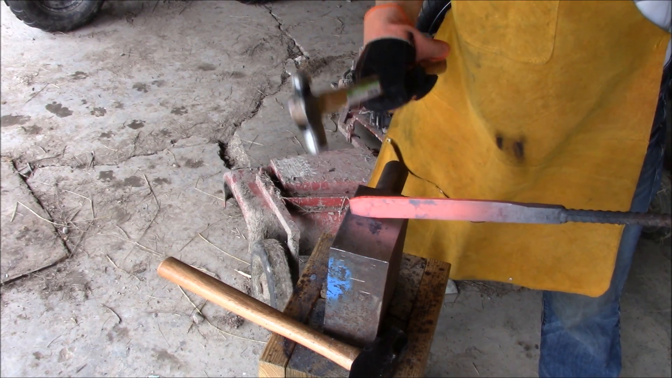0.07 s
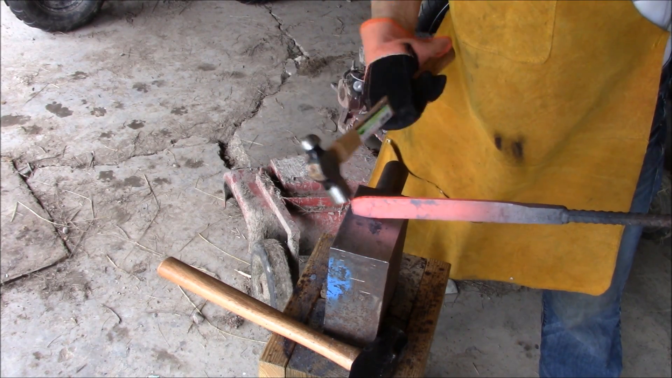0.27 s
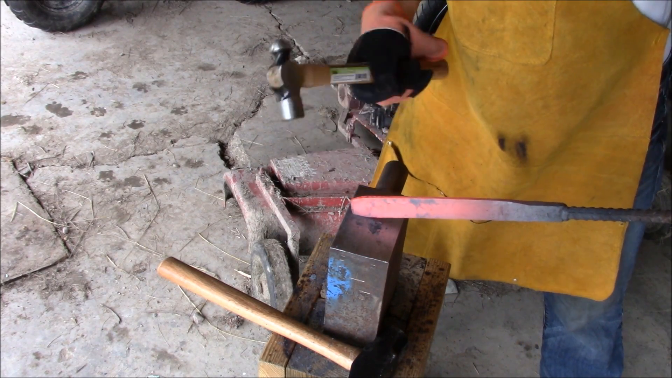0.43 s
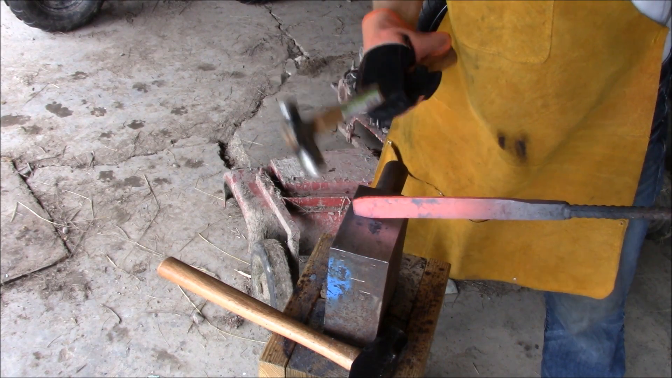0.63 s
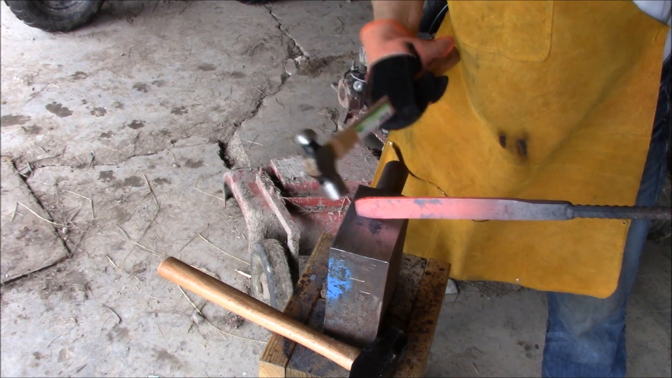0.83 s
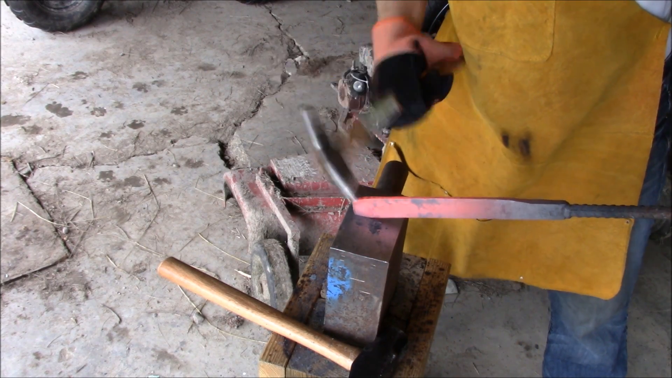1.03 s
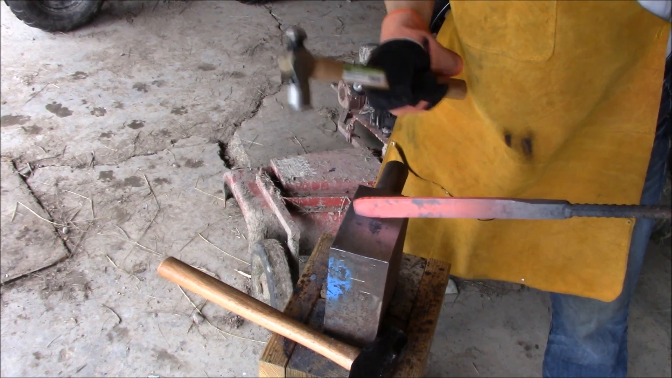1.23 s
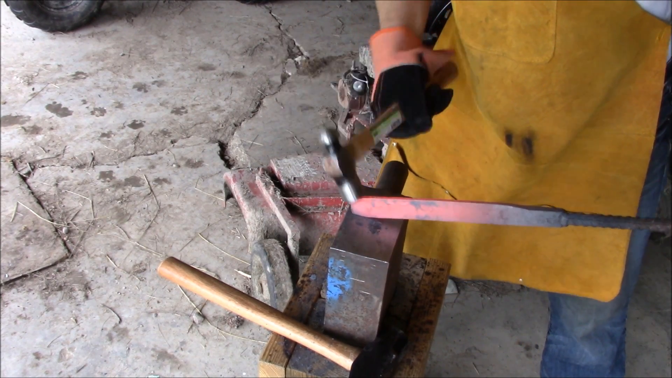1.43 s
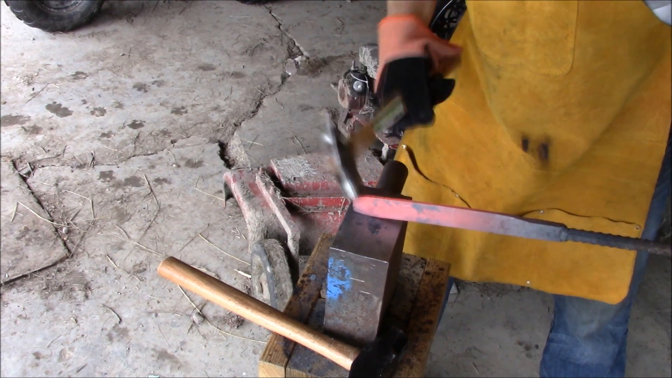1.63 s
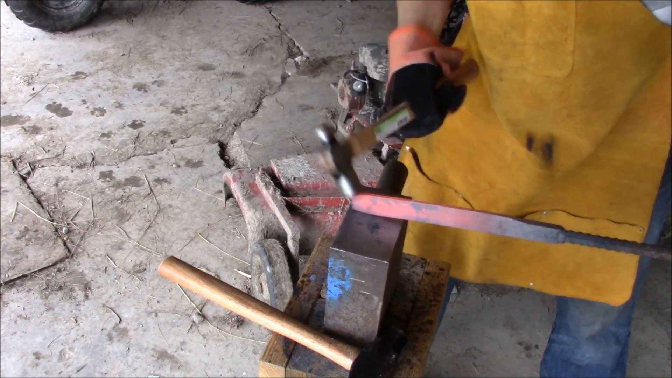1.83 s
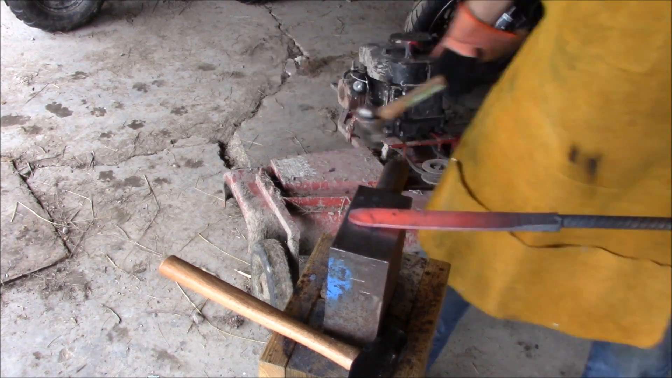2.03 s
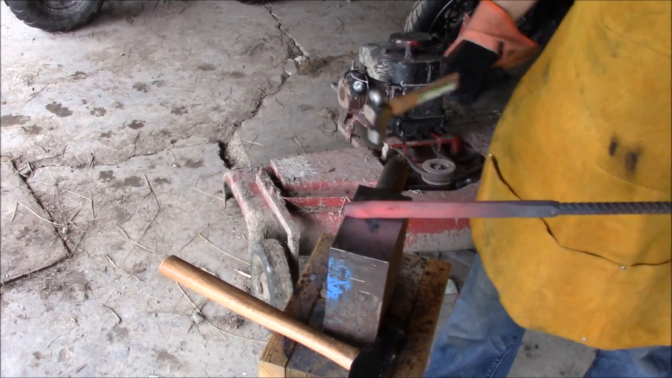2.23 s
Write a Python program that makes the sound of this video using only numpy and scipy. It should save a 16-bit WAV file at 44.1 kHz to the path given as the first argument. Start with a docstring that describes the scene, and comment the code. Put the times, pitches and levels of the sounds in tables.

```python
"""Five heavy hammer blows flatten a glowing steel bar on an anvil in a hard-walled workshop.
Each is a noise crack with a thud of short sines, coloured by the steel's resonances, then answered
by dense decaying noise and booming sines. After a brief dropout time runs four times as fast:
the blows become a high, quick rattle, then noise bursts knock and scrape as the bar leaves the anvil.
Under it lie air noise and a machine's faint sine hum, silent only in the dropout."""
import sys
import numpy as np
from scipy import signal
from scipy.fft import rfft, irfft
from scipy.io import wavfile
from scipy.ndimage import uniform_filter1d

SR = 44100
rng = np.random.default_rng(int(sys.argv[2]) if len(sys.argv) > 2 else 0)


def to_wav(sig):
    """Store sig (one row per channel, or 1-D mono) as 16-bit WAV at the path in sys.argv[1].

    Samples outside -1..1 are clipped; the rate is SR.
    """
    pcm = np.clip(np.atleast_2d(sig), -1, 1) * 32767
    pcm = np.round(pcm).astype(np.int16)
    wavfile.write(sys.argv[1], SR, pcm.T)  # frames by channels


N = 101430
T = np.arange(N) / SR  # s
RING = T[:SR * 3 // 4]  # time axis of one blow, s
FREQS = np.fft.rfftfreq(N, 1 / SR)  # Hz


def amp(db):
    """Decibels to gain."""
    return 10 ** (np.asarray(db) / 20)


def unit(x):
    """Scale so that the mid channel has rms 1."""
    return x / np.sqrt(np.mean(x[0] ** 2) + 1e-20)


def along(points, hz):
    """Read (Hz, value) points on a log frequency axis."""
    f, v = np.transpose(points)
    return np.interp(np.log(hz + 1), np.log(f + 1), v)


def noise(gain, width, speed=1):
    """Mid and side noise with the given gain per frequency; width sets the side level."""
    white = rfft(rng.standard_normal((2, N)))
    side = amp(along(width, FREQS / speed))
    mid_side = np.array([np.ones(len(FREQS)), side])
    return unit(irfft(white * gain * mid_side, N))


def add(out, s, x):
    """Mix x into out from time s."""
    i = round(s * SR)
    out[:, i:i + x.shape[1]] += x[:, :N - i]


def swell(t, rise, hold, t60):
    """Sound builds up, holds, then dies away by 60 dB in t60 seconds."""
    return (1 - np.exp(-t / rise)) * amp(-60 * np.maximum(t - hold, 0) / t60)


def low_cut(x, hz):
    """Second-order high-pass: removes the bass below hz."""
    return signal.sosfilt(signal.butter(2, hz, "high", fs=SR, output="sos"), x)


def hammering(blows, speed, room, crack, room_db, crack_db, crack_t60, thud_db, treble_hz, bass_hz, order):
    """Blows of crack, thud, boom and room answer; order picks the level column of the mode tables."""
    # Resonances of bar, hammer and anvil. Each row: natural-speed frequency in Hz, width in Hz,
    # lift in heavy blows in dB, lift in quick blows in dB.
    steel_modes = [(992, 24, 0, 10), (1670, 130, 5, -1.5), (1906, 16, 10, -11), (2525, 53, 5.5, 9),
                   (2482, 40, 6.5, 4), (3009, 29, 9, 16), (3227, 144, 8, -9), (4040, 66, 14, 7),
                   (4910, 170, 13.5, -14), (5964, 120, 18.5, 0), (7030, 37, 15, 0), (7480, 50, 6, 0),
                   (8260, 154, 9.5, -8), (9526, 66, 17.5, 0), (11020, 90, 10.5, 0), (11200, 120, 6, 0),
                   (12000, 50, 9, 0), (13400, 90, -6, 3)]
    # Booming modes of stand and room. Each row: natural-speed frequency in Hz, level in heavy blows in dB,
    # level in quick blows in dB, natural-speed t60 in seconds.
    boom_modes = [(102.4, -40.5, -39, 0.46), (155.7, -39, -36.5, 0.64), (195.9, -32.5, -34.5, 0.36),
                  (243.8, -30, -30.5, 0.65), (251.8, -30.5, -34, 0.23), (287.1, -35, -34.5, 0.62),
                  (302.5, -36, -30.5, .45), (329.5, -30, -30, 0.27), (345.3, -31.5, -35, 0.15),
                  (431.3, -37, -32.5, .35), (472.7, -29.5, -33, 0.22), (719, -40, -35, 0.47),
                  (817.4, -31.5, -50, 0.32), (992, -48, -51, 0.28), (1039, -25, -34, 0.24),
                  (1174, -50, -41, 0.33)]
    # Dull thud of the soft hot bar. Each row: natural-speed frequency in Hz, relative level in dB,
    # natural-speed t60 in seconds.
    thud_modes = [(507, -14.5, 0.012), (705, -12, 0.021), (1090, -14.5, 0.042), (1222, -18, 0.035),
                  (2588, -6.5, 0.015)]
    # Stereo width of the blows. Each row: natural-speed frequency in Hz, side level in dB.
    blow_width = [(45, -18), (90, -40), (180, -60), (350, -43), (700, -35.5), (1400, -27.5), (2800, -19.5),
                  (5600, -16), (11000, -15)]
    fresh = 0.19  # share of noise power that differs from blow to blow
    crack_ring = 0.79  # how much of the steel's resonance colours the crack

    t = RING * speed  # natural-speed seconds
    steel = 1
    for hz, width, *lift in steel_modes:
        peak = amp(lift[order]) ** 2 - 1
        steel = steel + peak / (1 + (2 * (FREQS / speed - hz) / width) ** 2)
    steel = np.sqrt(np.maximum(steel, .1))  # power to gain
    room_gain = amp(along(room, FREQS)) * steel
    crack_gain = amp(along(crack, FREQS)) * steel ** crack_ring

    def draw():
        """Noise for the room answer and for the crack."""
        return np.array([noise(gain, blow_width, speed) for gain in (room_gain, crack_gain)])

    same = draw()  # common to all blows
    phases = rng.uniform(0, 2 * np.pi, len(boom_modes))
    boom = []
    for (hz, *db, t60), phase in zip(boom_modes, phases):
        envelope = swell(t, rise=0.011, hold=0.049, t60=t60)
        boom.append(amp(db[order]) * envelope * np.sin(2 * np.pi * hz * t + phase))
    boom = np.array(boom)
    thud = np.zeros(len(t))
    for k, (hz, db, t60) in enumerate(thud_modes):
        envelope = swell(t, rise=0.0007, hold=0, t60=t60)
        thud += (-1) ** k * amp(db + thud_db) * envelope * np.sin(2 * np.pi * hz * t)

    treble = 1 / (1 + (treble_hz / (FREQS + 1)) ** 4)  # near 0 in the bass, rising through treble_hz
    out = np.zeros((2, N))
    for s, db, treble_db, snap_db in blows:
        blend = np.sqrt(1 - fresh) * same + np.sqrt(fresh) * draw()
        walls, snap = irfft(rfft(blend) * amp(treble_db * treble), N)[..., :len(t)]
        contact = amp(crack_db + snap_db - 60 * t / crack_t60) * snap
        contact[0] += thud
        blow = low_cut(contact, bass_hz) + amp(room_db) * room_answer(walls, speed)
        mode_gains = amp(rng.normal(0, 1, len(boom_modes)))  # each boom varies by about 1 dB
        blow[0] += mode_gains @ boom
        add(out, s, amp(db) * blow)
    return low_cut(out, 35 * speed)


def room_answer(x, speed):
    """Dense reflections in which every frequency builds and dies at its own pace."""
    # Decay. Each row: natural-speed frequency in Hz, natural-speed t60 in seconds.
    decay = [(100, 0.42), (300, 0.57), (1000, 0.4), (3000, .4), (6000, 0.34), (10000, .28), (15000, 0.29)]
    # Hold before the fade. Each row: natural-speed frequency in Hz, natural-speed time in seconds.
    hold = [(100, 0.042), (1000, 0.061), (4000, 0.051), (12000, 0.027)]
    # Build-up. Each row: natural-speed frequency in Hz, natural-speed time constant in seconds.
    rise = [(100, 0.0078), (400, 0.0096), (1500, 0.003), (10000, 0.0014)]
    hz, t, bands = signal.stft(x, SR, nperseg=128)
    hz = hz[:, None] / speed
    shape = swell(t * speed, along(rise, hz), along(hold, hz), along(decay, hz))
    return signal.istft(bands * shape, SR, nperseg=128)[1][:, :len(RING)]


def bar_lifted():
    """The bar knocks lightly and slides off the anvil: noise bursts and a gritty, fluctuating scrape."""
    # Light knocks. Each row: start in seconds, level in dB, centre of the noise in Hz, t60 in seconds.
    knocks = [(2.0622, -42.5, 11000, .06), (2.075, -45, 1390, 0.13), (2.1945, -37.5, 1800, 0.059)]
    # Scrape loudness. Each row: time in seconds, level in dB.
    scrape_level = [(2.126, -63), (2.129, -49.5), (2.155, -49), (2.17, -38.5), (2.185, -41.5), (2.21, -65),
                    (2.235, -71), (2.3, -61)]
    # Scrape colour. Each row: frequency in Hz, relative level in dB per Hz.
    scrape_colour = [(60, -55), (250, -30), (450, -10), (1000, -5), (1760, -3.5), (3400, -1), (7000, -3.5),
                     (13700, -13.5), (16000, -16)]
    # Stereo width of knocks and scrape. Each row: frequency in Hz, side level in dB.
    lift_width = [(200, -11.5), (1400, -32), (5000, -39)]
    grit = unit(uniform_filter1d(rng.standard_normal((1, N)), size=130))  # smoothed over about 3 ms
    grit_db = 1.7 * grit
    scrape_db = np.interp(T, *np.transpose(scrape_level), left=-120)
    out = amp(scrape_db + grit_db) * noise(amp(along(scrape_colour, FREQS)), lift_width)
    for s, db, hz, t60 in knocks:
        body = (FREQS / hz) ** 2 / (1 + (FREQS / hz) ** 2) ** 2  # broad hump around hz
        add(out, s, amp(db - 60 * T / t60) * noise(body, lift_width))
    return low_cut(out, hz=330)


def workshop(colour, air_db, hum_hz, hum_db, speed):
    """Still air as coloured noise, and the steady hum of a distant machine as one sine."""
    # Stereo width of the air. Each row: natural-speed frequency in Hz, side level in dB.
    air_width = [(45, -15), (350, -8), (700, -15.5), (1400, -12), (2800, -13), (8000, -9)]
    out = amp(air_db) * noise(amp(along(colour, FREQS)), air_width, speed)
    out[0] += amp(hum_db) * np.sqrt(2) * np.sin(2 * np.pi * hum_hz * T)  # hum_db is an rms level
    return out


def scene():
    """Heavy blows, a short silence, then the same work at four times the speed."""
    # Blows. Each row: start in seconds, level in dB, treble lift in dB, extra crack level in dB.
    heavy_blows = [(.2319, -5, -14, 8.5), (.5089, -2.5, 0, 4), (.7726, -2, 6.5, 3), (1.0272, -1.63, 0, 2),
                   (1.2824, -1.5, 4.5, 2.5)]
    quick_blows = [(1.447, -4.5, 1, 0), (1.5107, -1.5, 2, 8), (1.5793, -0.5, -4, -2), (1.6464, 0, 1, 2),
                   (1.7118, -.7, 2.5, -17), (1.7793, .7, -1, 4), (1.8453, .7, -6, -2),
                   (1.9102, -0.9, 2.5, -7), (1.975, -0.5, 1.5, -13)]
    # Colours of room answer, crack and air. Each row: frequency in Hz, relative level in dB per Hz.
    heavy_room = [(30, -33), (60, -21), (100, -14), (220, 3.5), (400, -2), (560, -4), (750, 2), (1100, 0.5),
                  (1400, -4.5), (2500, -7), (3600, -12.5), (5400, -18), (7500, -12.5), (9000, -18),
                  (12000, -21), (16000, -36)]
    heavy_crack = [(30, -31.5), (150, 2.5), (500, -4), (1100, 6), (1700, -0.5), (2100, -3), (2600, -2.5),
                   (3500, -9), (4000, -1), (5300, -12), (7000, -2), (10500, -7), (13000, -28), (16000, -17)]
    quick_room = [(40, -27), (200, -29.5), (320, -14.5), (550, -7.5), (1000, 1), (1600, 0.5), (2100, -4.5),
                  (2800, 2), (4200, -5), (5500, -4), (8000, -3.5), (11000, -10.5), (13500, -9),
                  (15000, -12.5), (16000, -24)]
    quick_crack = [(40, -16), (250, -31), (700, -7), (1500, -35), (2700, -1), (4500, 8), (6500, 6.5),
                   (10000, 4), (13000, -8), (16000, 5)]
    slow_air = [(25, -32), (53, -24), (165, -20), (260, -17.5), (480, -21), (640, -14), (830, -15.5),
                (1300, -21), (2000, -31), (2600, -32.5), (3080, -27.5), (4200, -37), (16000, -50.5)]
    quick_air = [(35, -71), (60, -32), (1170, -8), (1620, -13), (2840, -10), (3120, -9), (3500, -10),
                 (8120, -25), (16000, -20)]
    # The first quick blow starts just before the silence, so only its tail is heard after it.
    cut_s, resume_s = 1.4592, 1.4918
    speed = 4  # times natural speed

    slow = hammering(heavy_blows, 1, heavy_room, heavy_crack, room_db=-18.5, crack_db=-13.5,
                     crack_t60=0.047, thud_db=1.5, treble_hz=11100, bass_hz=208, order=0)
    fast = hammering(quick_blows, speed, quick_room, quick_crack, room_db=-19, crack_db=-18,
                     crack_t60=0.025, thud_db=-1.5, treble_hz=9900, bass_hz=700, order=1)
    slow = slow + workshop(slow_air, air_db=-57.5, hum_hz=637.56, hum_db=-60.5, speed=0.99)
    fast = fast + workshop(quick_air, air_db=-56.5, hum_hz=2576, hum_db=-69, speed=speed)
    fast = fast + bar_lifted()
    mid, side = slow * (T < cut_s) + fast * (T > resume_s)
    return np.array([mid + side, mid - side])


def record(dry):
    """The loudest peaks are rounded off below a ceiling and a steep filter ends the treble."""
    ceiling, top_hz = 0.6, 15900  # full scale = 1, Hz
    held = dry / (1 + np.abs(dry / ceiling) ** 6) ** (1 / 6)
    return irfft(rfft(held) / np.sqrt(1 + (FREQS / top_hz) ** 160), N)


dry = scene()
out = record(dry)
to_wav(out)
```